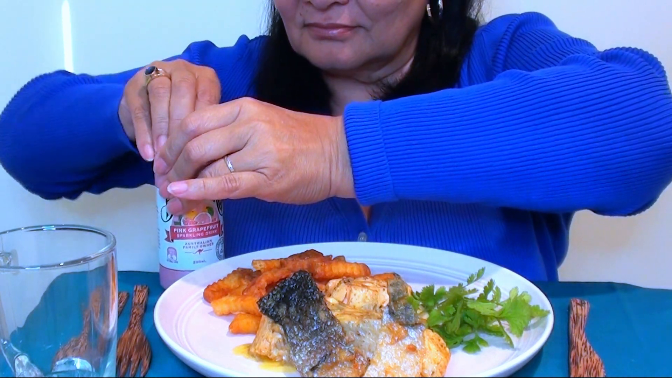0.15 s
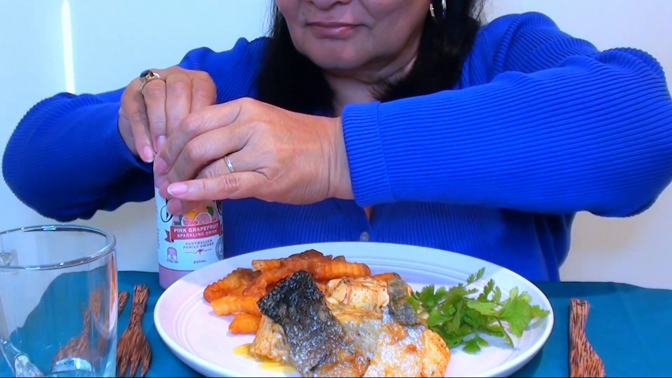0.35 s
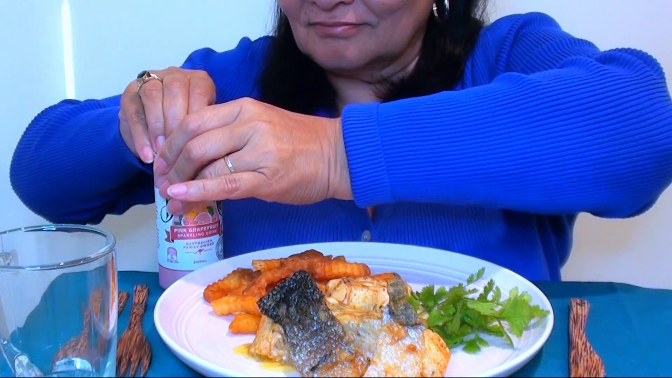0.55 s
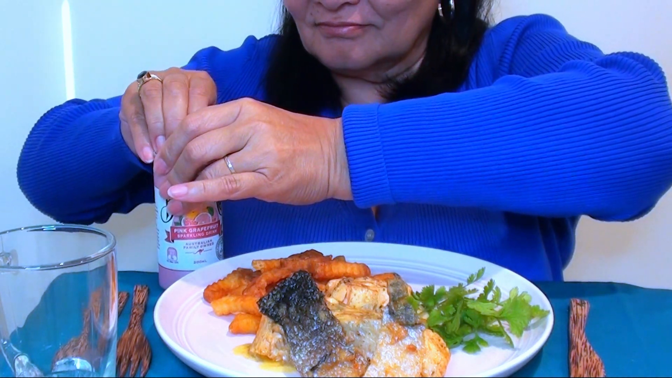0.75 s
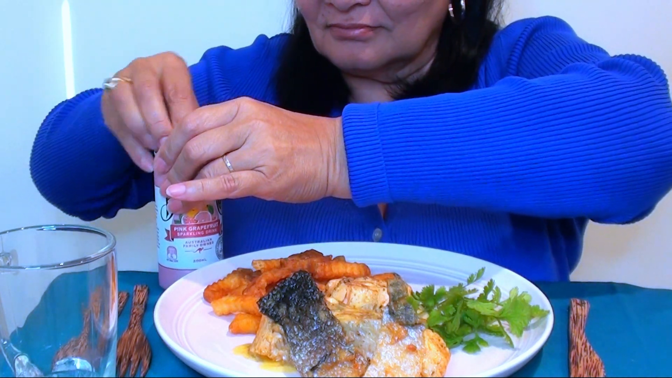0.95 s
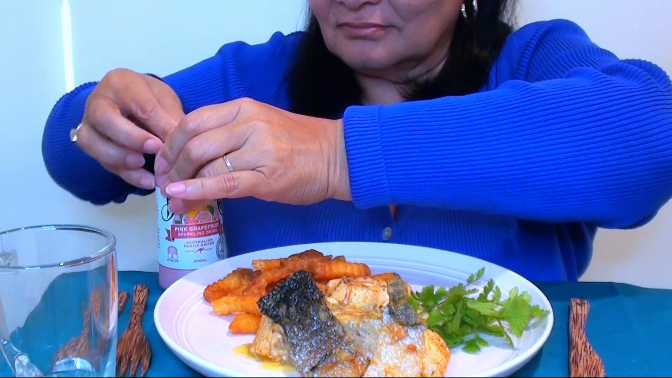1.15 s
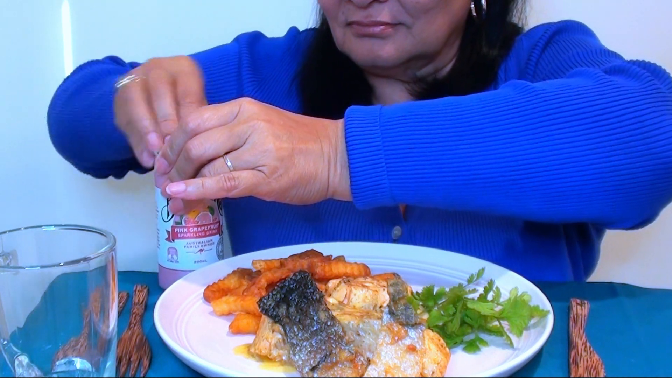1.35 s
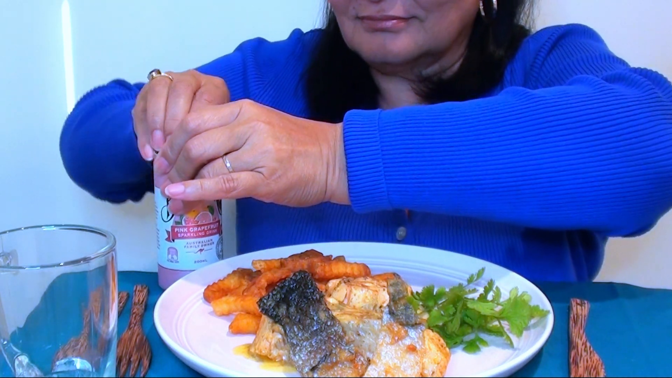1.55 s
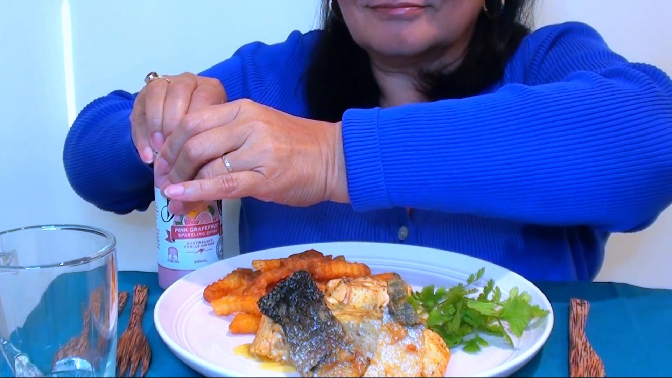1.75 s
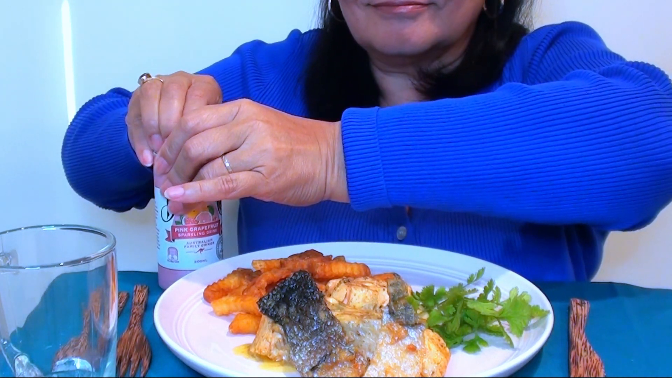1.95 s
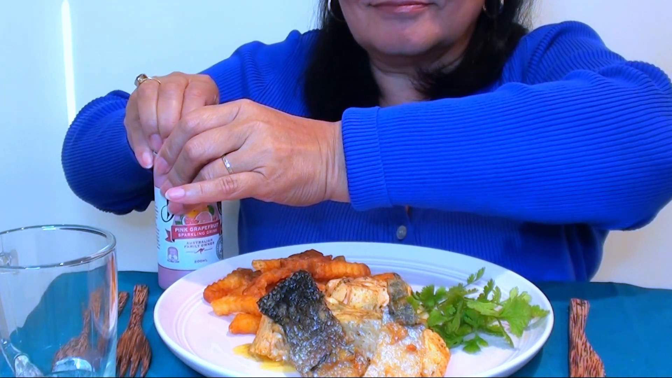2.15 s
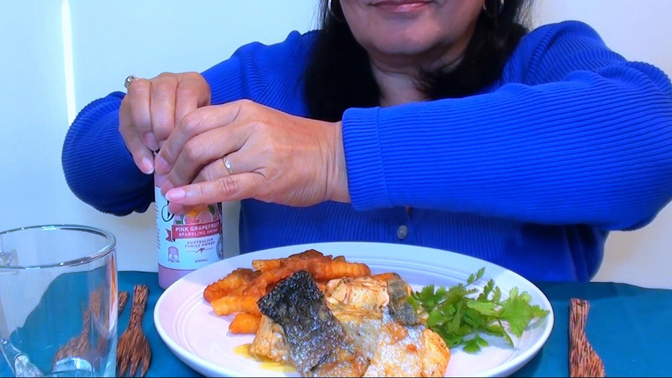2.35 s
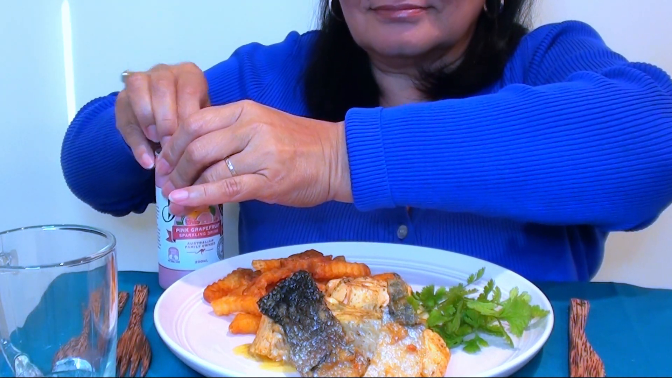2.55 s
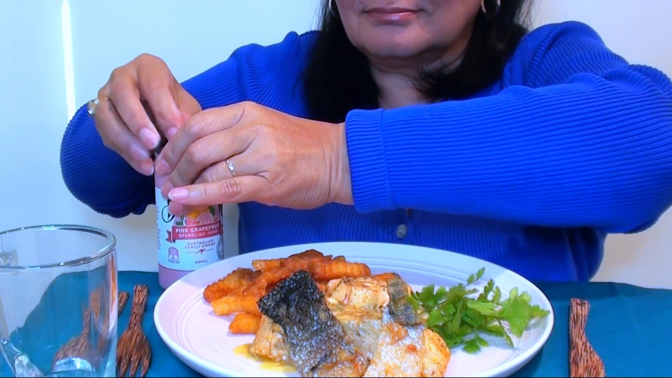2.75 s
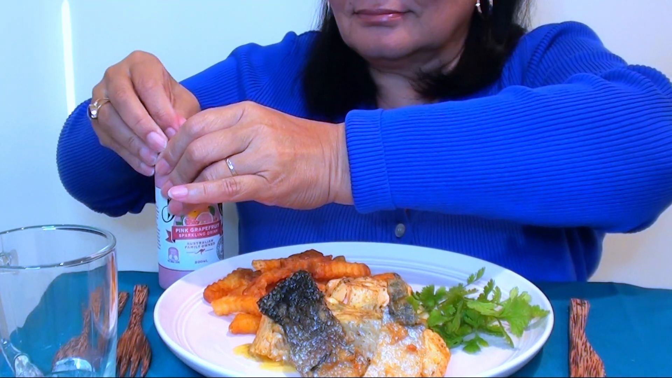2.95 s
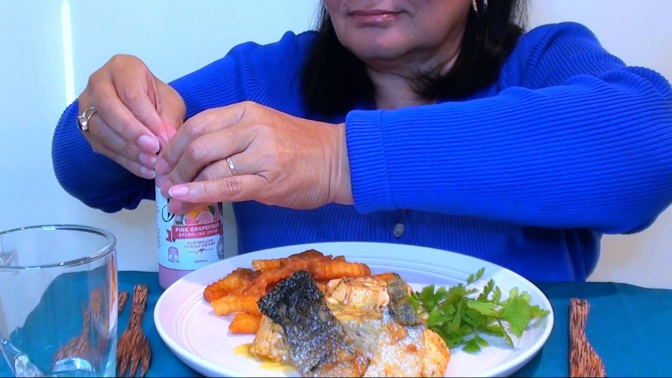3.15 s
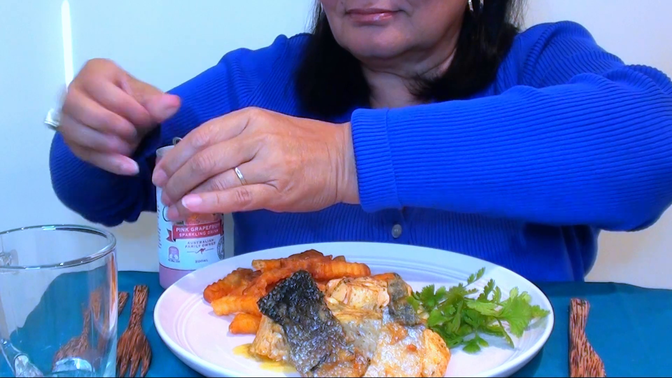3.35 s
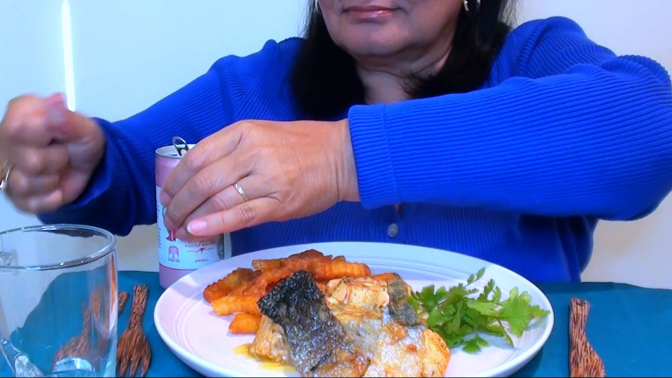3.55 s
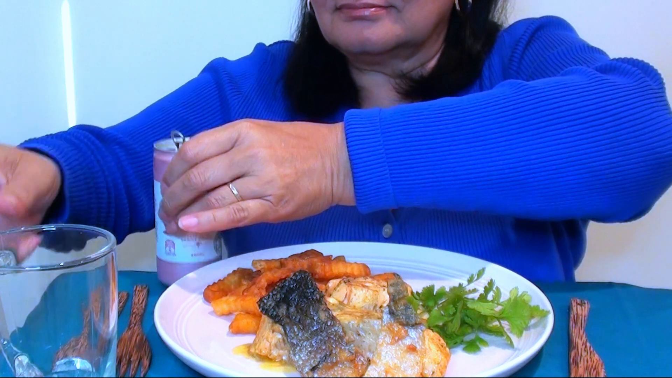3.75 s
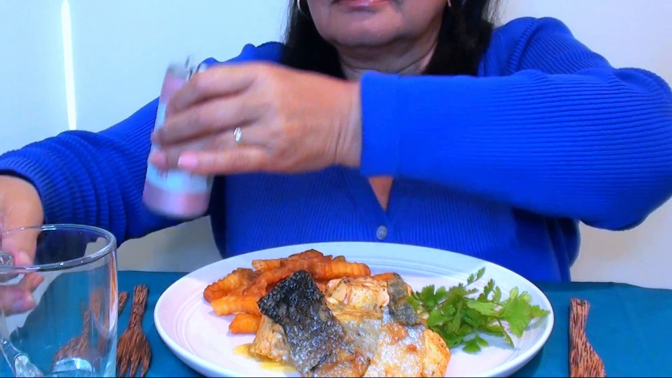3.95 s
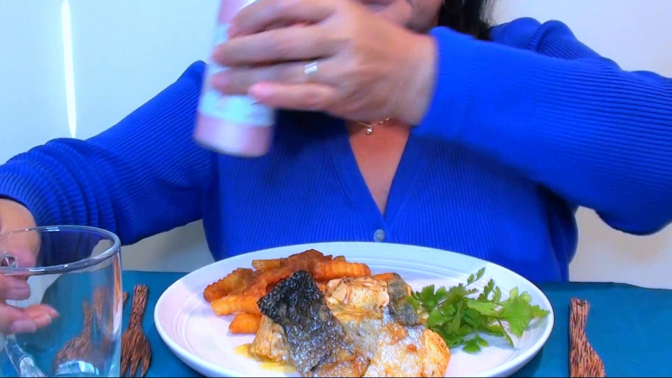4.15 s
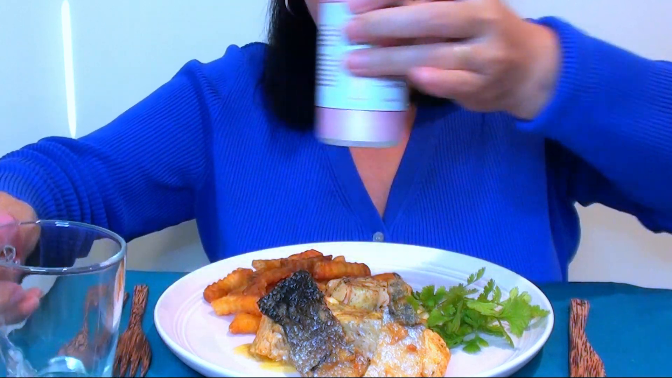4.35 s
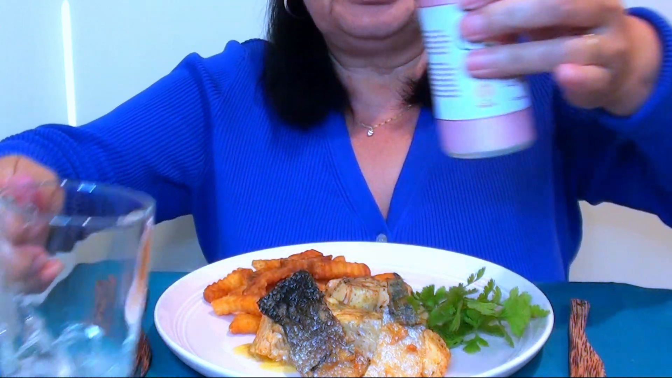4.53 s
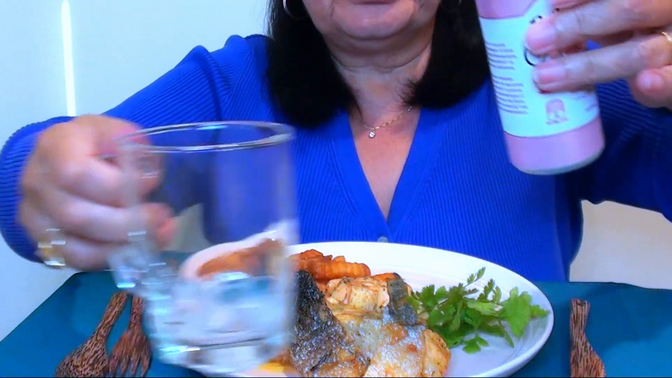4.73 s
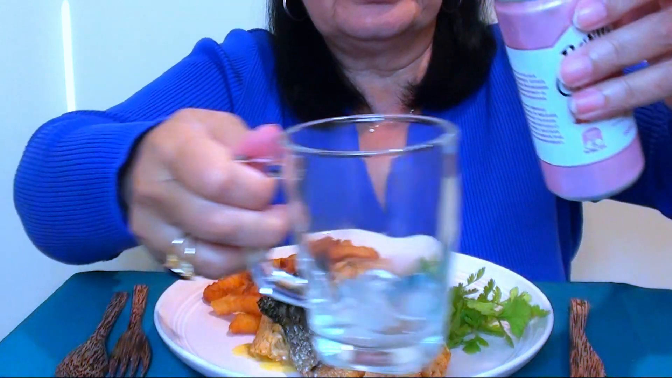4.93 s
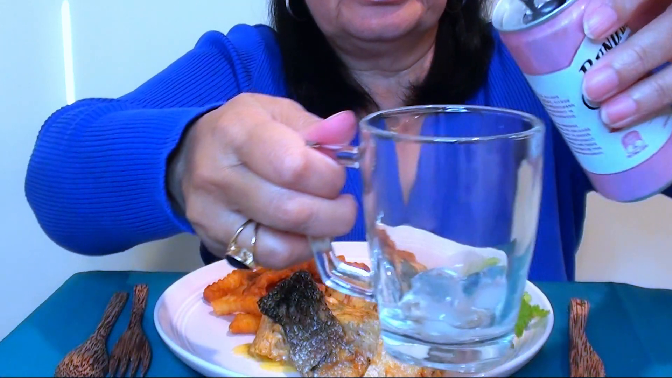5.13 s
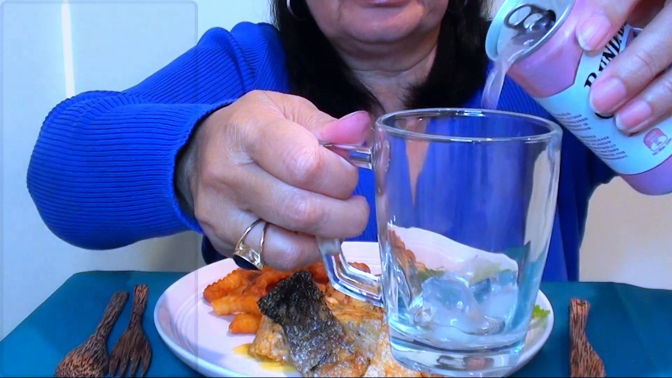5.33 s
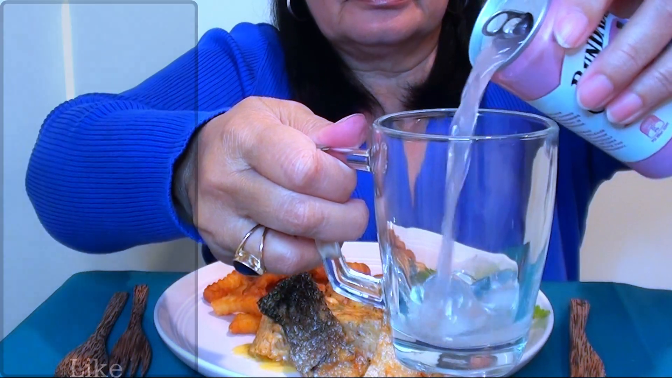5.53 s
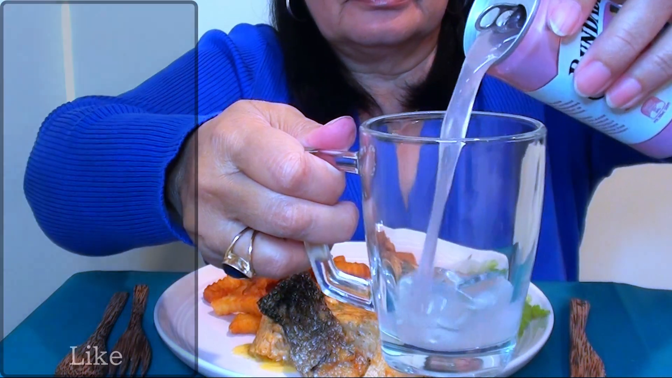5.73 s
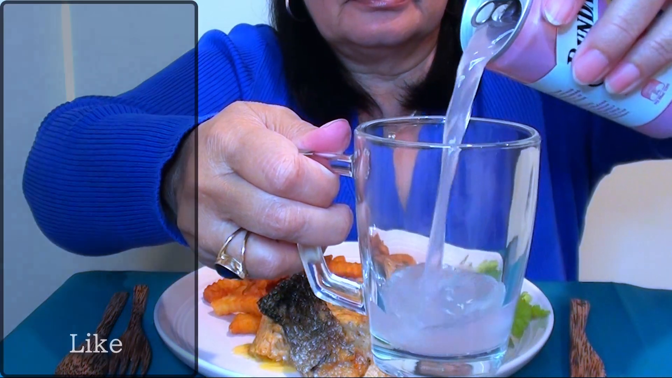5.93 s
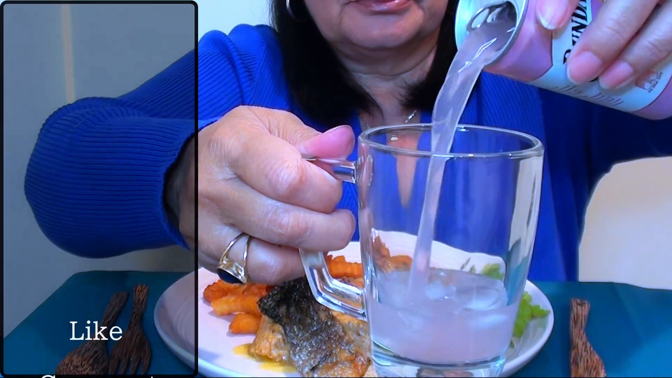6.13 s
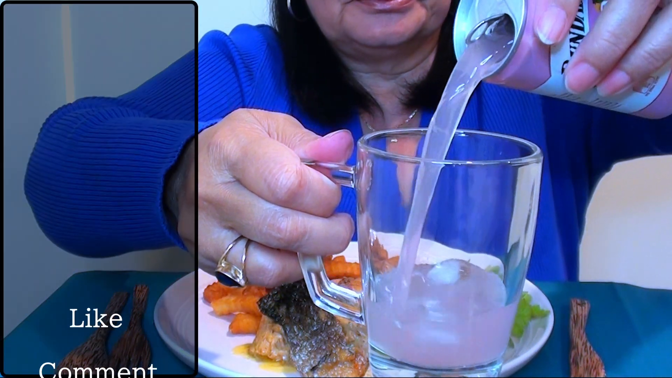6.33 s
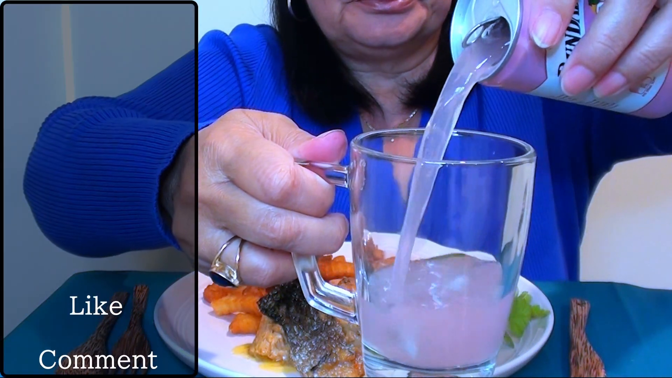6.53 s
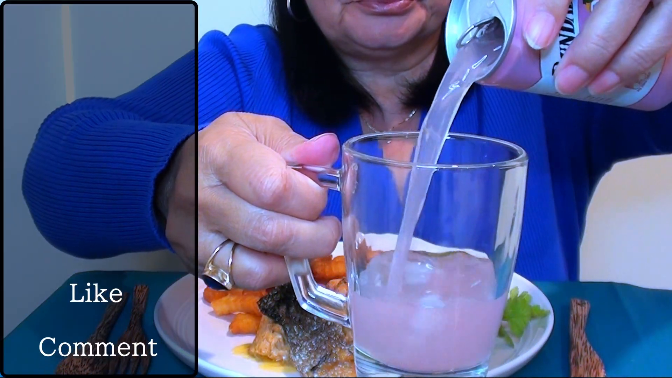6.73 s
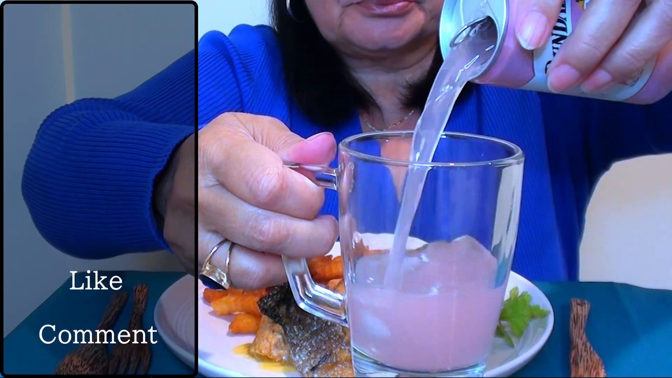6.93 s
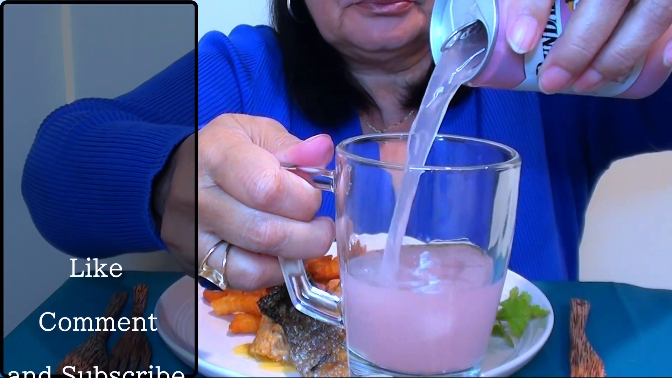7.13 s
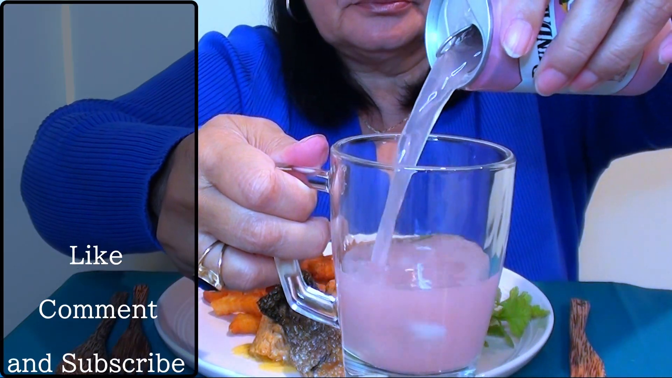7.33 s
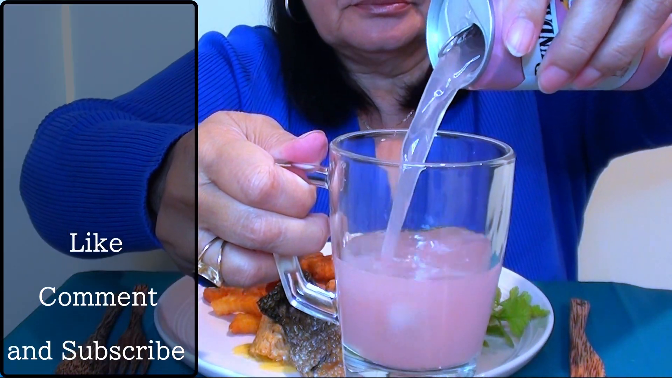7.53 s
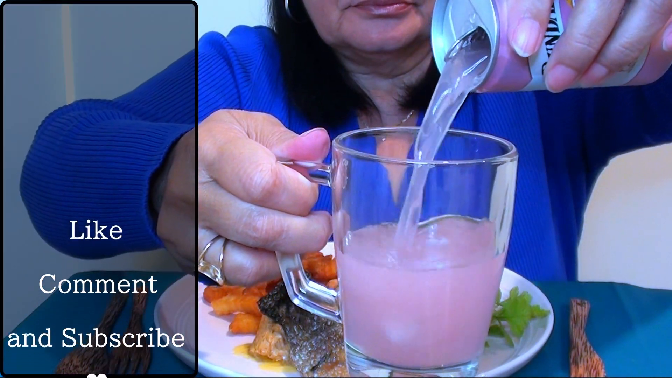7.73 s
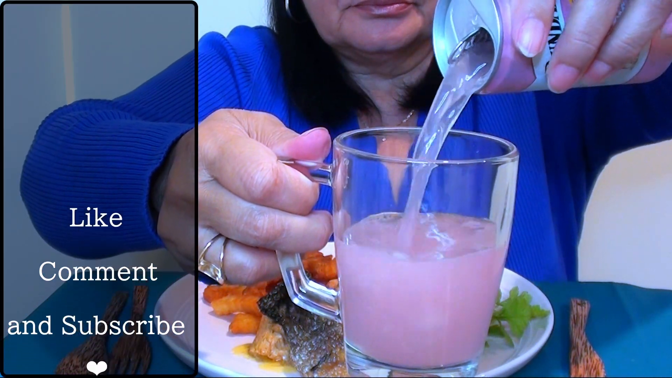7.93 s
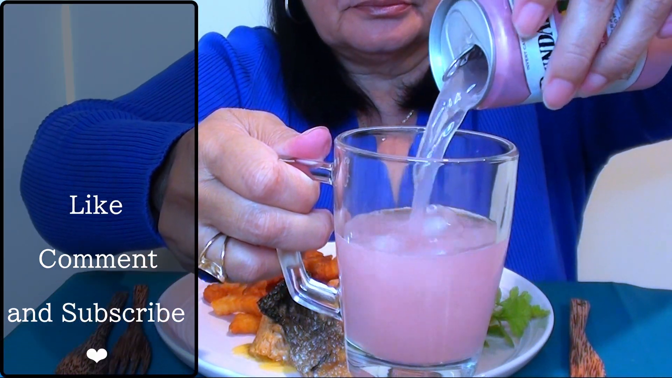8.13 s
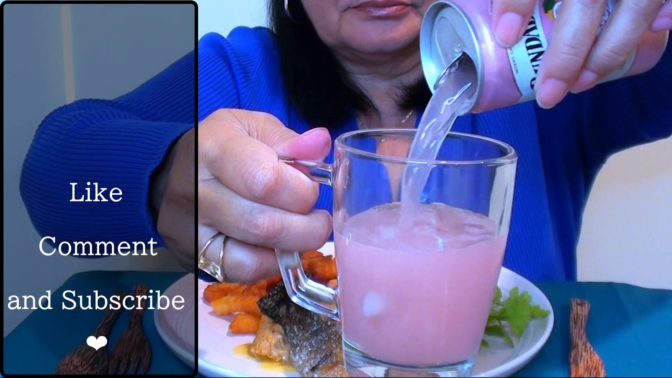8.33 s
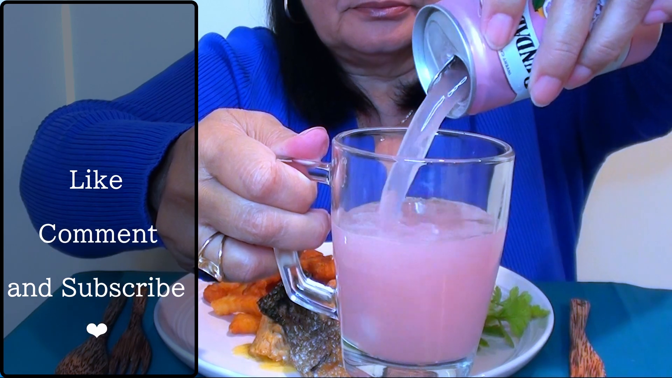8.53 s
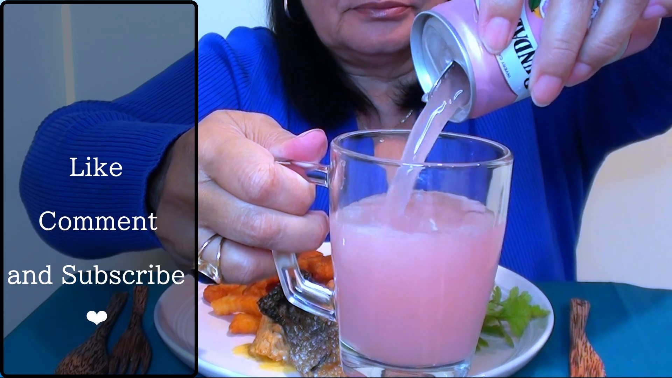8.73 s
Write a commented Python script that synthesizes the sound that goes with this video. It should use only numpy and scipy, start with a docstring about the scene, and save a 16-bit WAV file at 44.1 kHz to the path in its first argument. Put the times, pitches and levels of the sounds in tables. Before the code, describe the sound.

Close up at a table in a quiet room, fingernails scuff and tick on a drink can's tab. The ticks quicken into a loud metallic crack and a brief hiss of gas, then faint fizz and small clicks. A glass mug with ice gives light clinks. Sparkling drink spatters onto the ice, then pours in a bubbling stream as foam hiss rises to the end.

```python
"""A drink can at a table, close by: fingers work the tab until it cracks open and the gas hisses out.
A glass mug is touched and filled: drops spatter on the ice, bubbles ring the air in mug and can, foam hisses.
Tab snaps are ticks and noise puffs driving resonances; glass touches are dying sines, short pings and noise
ticks. Bubbles and drops are mainly dying sines climbing in pitch; gas, foam and finger rubs are shaped noise.
A short echo and a quiet room surround them, in one channel."""
import sys
import numpy as np
from scipy import signal
from scipy.fft import rfft, irfft
from scipy.io import wavfile
from scipy.ndimage import uniform_filter1d

SR = 44100
rng = np.random.default_rng(int(sys.argv[2]) if len(sys.argv) > 2 else 0)


def to_wav(s):
    """Save 16-bit WAV."""
    ch = np.atleast_2d(s).T  # columns
    pcm = np.round(np.clip(ch, -1, 1) * 32767)  # PCM
    wavfile.write(sys.argv[1], SR, pcm.astype(np.int16))


N = 387198

# Colour of the quiet room: pitch_hz, density_db (per Hz, relative)
ROOM_COLOUR = [(26, -33.5), (45, -3), (96, -24.5), (284, -17.5), (338, -27.5), (401, -16.5), (859, -18.5),
               (1020, -18), (1150, -20.5), (1800, -20.5), (2130, -23.5), (3010, -22.5), (4920, -27),
               (16000, -31)]
# A slow rumble, perhaps the table swaying: time_s, level_db
RUMBLE_LEVEL = [(0.0, -51.5), (0.78, -54.5), (1.1, -45.5), (1.2, -55), (1.39, -44), (2.01, -56),
                (2.05, -43.5), (2.27, -50.5), (2.32, -64), (2.44, -41), (2.57, -51), (3.81, -45.5),
                (4.04, -56.5), (5.77, -58), (6.65, -65), (6.94, -60), (7.24, -61.5), (8.78, -63)]
# Colour of that rumble: pitch_hz, density_db (per Hz, relative)
RUMBLE_COLOUR = [(3, -31), (8, 1.5), (16, 3), (28, -6.5), (40, -12.5), (70, -42.5), (140, -56), (220, -65)]
# A soft low rush that swells as the arms move: time_s, level_db
RUSTLE_LEVEL = [(0.0, -69.5), (0.9, -75.5), (1.22, -65), (3.03, -79), (3.23, -68.5), (3.79, -81),
                (4.3, -72.5), (4.79, -74.5), (5.04, -61.5), (5.28, -80), (5.79, -80.5), (6.46, -72),
                (7.04, -86), (7.43, -75.5), (8.02, -74.5), (8.78, -82)]
# A faint low tone: time_s, level_db
DRONE_LEVEL = [(2.33, -78), (2.42, -59), (2.8, -82), (3.26, -72), (3.65, -90), (4.11, -80.5), (4.6, -100)]
# Fingers and nail scuff the can: start_s, level_db, length_s, squeak_hz, squeak_db
RUBS = [(0, -68, 0.052, 2150, -62.5), (0.071, -53, 0.047, 3270, -74), (0.173, -62.5, 0.088, 3530, -64),
        (0.81, -76, 0.31, 3100, -75), (0.921, -58.5, 0.11, 2130, -55), (0.933, -74, 0.084, 3050, -58),
        (0.977, -73, 0.065, 1850, -64), (1.02, -59, .08, 3200, -74), (1.152, -58, 0.057, 4740, -66),
        (1.306, -51.5, 0.014, 2970, -78), (1.365, -61, 0.075, 2900, -63), (1.689, -98, 0.21, 626, -66),
        (1.98, -47.5, 0.14, 633, -65), (2.138, -57, 0.1, 744, -63), (3.268, -67.5, 0.32, 2880, -73),
        (3.6, -70.5, 0.17, 3140, -71)]
# Colour of the scuffs: pitch_hz, density_db (per Hz, relative)
RUB_COLOUR = [(530, -53), (900, -40), (1600, -12), (2080, -10), (2600, -15.5), (2990, -9), (3870, -11.5),
              (4790, -9), (6980, -16.5), (9590, -18), (15000, -30.5)]
# The tab snaps and knocks on the lid; the last three levels are relative to level_db:
# start_s, level_db, ring_hz, treble_db, lid_db, hollow_db
SNAPS = [(0.084, -32, 3000, -7, -33, -24), (0.121, -25, 5230, -25, -14, -29),
         (0.237, -41, 2960, -18, -31, -27), (0.928, -29.5, 2150, -22, -24.5, -20),
         (1.305, -47.5, 2990, 9, -9, -14), (1.398, -39, 2800, -2, -12.5, -22),
         (1.841, -42.5, 5600, -7, -13, -26), (1.88, -34, 5640, -15, -4.5, -22),
         (1.918, -22.5, 5740, 13.5, -5.5, -37), (1.962, -18, 3240, -14, -4, -39),
         (1.99, -27, 4200, 8.5, -4.5, -45), (2.03, -16, 5440, -21, -20, -42.5),
         (2.148, -24.5, 4300, -2.5, -14.5, -38.5), (2.175, -42.5, 3400, -11, 3.5, -21.5),
         (2.229, -18.5, 5850, 4, -11.5, -39), (2.258, -28.5, 3620, -27.5, -10.5, -22.5),
         (2.271, -30, 5390, -3, -14, -6), (2.28, -14, 5600, -9.5, -22, -35),
         (2.283, -5.5, 2970, 0.5, -18, -29.5), (2.631, -31, 1270, -26, -19, -13.5),
         (2.882, -33.5, 1434, 11.5, 1.5, -3), (3.079, -39, 1350, -20, -8.5, -4.5),
         (3.162, -46, 1360, -9, -30, -8.5), (3.299, -40.5, 2840, 6, -12, -14),
         (3.371, -44.5, 1810, -8, -14, -10.5), (3.543, -43.5, 1410, -3, -17, -25)]
# Resonances of the metal lid: pitch_hz, width_hz, level_db
LID_MODES = [(633, 180, -29), (2270, 1200, 13.5), (3250, 390, 10), (3740, 820, 9.5), (4330, 590, 2),
             (4886, 400, -2), (5600, 449, 7), (7100, 430, -2), (8460, 1100, 3.5), (10820, 7000, -1.5)]
# Resonances of the air in the can: pitch_hz, width_hz, level_db
HOLLOW_MODES = [(1350, 387, 0), (1960, 440, -4.5), (2290, 110, -18), (3180, 730, 5.5), (3680, 95, -17),
                (5060, 200, -12)]
# Gas rushes out of the cracked seal: time_s, level_db
GAS_LEVEL = [(2.285, -60), (2.3, -43.5), (2.35, -39), (2.44, -41), (2.52, -56.5), (2.6, -63), (2.75, -102)]
# Colour of the gas jet: pitch_hz, density_db (per Hz, relative)
JET_COLOUR = [(290, -59.5), (500, -26.5), (851, -17.5), (1150, -4.5), (1410, -14), (1700, -7.5),
              (1820, -12.5), (2460, -16.5), (3330, -3.5), (3850, -10), (5130, -11.5), (8120, -21.5),
              (8980, -25), (12700, -27.5), (15500, -48)]
# The drink fizzes inside the can: time_s, level_db
SIMMER_LEVEL = [(2.4, -82), (2.6, -71.5), (2.8, -68), (2.9, -62.5), (3.1, -63.5), (3.4, -72), (3.74, -67.5),
                (3.79, -83)]
# Colour of that fizz: pitch_hz, density_db (per Hz, relative)
SIMMER_COLOUR = [(1180, -44), (2000, -14), (2360, -21), (3060, 3.5), (3860, -11), (4210, 0), (4630, -10),
                 (5090, 2), (5690, 1), (8480, -0.5), (10200, -5), (14700, -5), (15800, -20)]
# A finger ring meets the glass: start_s, level_db
RING_TAPS = [(4.057, -55)]
# The mug is touched and ice shifts in it: start_s, level_db, pitch_hz, tick_db (relative to level_db)
CLINKS = [(4.6784, -48, 2920, -3), (4.8553, -34, 1440, -6.5), (4.889, -51, 1540, 2),
          (4.9232, -57, 6130, 13), (4.9346, -42.5, 7720, 1), (4.954, -45.5, 1260, -12),
          (5.209, -48, 1120, -3), (5.247, -57, 2060, -2)]
# Ringing modes of the glass: pitch_hz, level_db, t60_s
GLASS_MODES = [(2140, 2, 0.3), (1940, -3, 0.48), (3450, -1.5, 0.19), (4450, -6, 0.18), (5389, -6, 0.18),
               (6580, -8, .19), (9150, -9, 0.045), (10630, -9, .05)]
# The stream, small bubbles churning and tiny ones crackling: time_s, churn_db, crackle_db
POUR_LEVELS = [(5.45, -95, -83), (5.71, -74, -52.5), (6.14, -57, -65), (6.4, -68, -63),
               (6.61, -60.5, -65.5), (6.89, -53.5, -58), (7.04, -49.5, -62), (7.16, -56.5, -58),
               (7.33, -57, -66), (7.55, -61, -61.5), (7.8, -51, -62), (7.95, -49.5, -56.5),
               (8.21, -53, -63), (8.35, -54.5, -62), (8.54, -60.5, -65), (8.78, -70, -53.5)]
# Drops spatter on ice and surface: start_s, level_db, pitch_hz, t60_s
DROPS = [(5.4831, -26.5, 7980, 0.0044), (5.5548, -23, 7840, 0.0035), (5.5624, -36, 7150, 0.005),
         (5.5754, -41, 14200, 0.005), (5.5894, -35, 4900, 0.005), (5.5936, -27, 4800, 0.0054),
         (5.6074, -28, 9100, 0.0046), (5.6127, -30.5, 4970, 0.005), (5.6392, -32, 5970, 0.005),
         (5.6615, -34, 11000, 0.005), (5.674, -28, 4800, 0.0056), (5.688, -19, 14200, 0.0037),
         (5.6956, -24, 4900, 0.0032), (5.7134, -22, 8540, 0.0031), (5.7354, -44, 3950, 0.005),
         (5.7424, -44, 4880, 0.005), (5.748, -38, 6790, 0.005), (5.7765, -31.5, 8740, 0.0046),
         (5.8017, -28.5, 11700, 0.005), (5.807, -31, 11800, 0.005), (5.8184, -45, 4050, 0.0055),
         (5.8596, -44, 8400, 0.005), (5.875, -38, 5840, 0.0056), (5.902, -35, 4010, 0.005),
         (5.907, -41, 4500, 0.005), (5.962, -25.5, 4200, 0.0032), (5.984, -22.5, 7200, 0.0021),
         (6.001, -41, 4310, 0.005), (6.0731, -40, 8400, 0.0062), (6.2685, -31.5, 7400, 0.0033),
         (6.343, -28, 4200, 0.0035), (6.356, -29, 8640, 0.0028), (6.3663, -34, 4760, 0.005),
         (6.561, -34.5, 9030, 0.0041), (6.6178, -12, 5140, 0.0027), (6.7298, -27.5, 5750, 0.0063),
         (6.7615, -29.5, 4200, 0.005), (6.814, -19.5, 4800, 0.003), (6.8994, -36, 7550, 0.0046),
         (6.9364, -35, 8760, 0.005), (6.9454, -26.5, 4300, 0.0035), (6.9624, -35, 6140, 0.005),
         (6.9845, -24, 4320, 0.0042), (7.034, -33, 5900, 0.0054), (7.1155, -26.5, 3800, 0.0036),
         (7.1374, -45, 4520, 0.0043), (7.2484, -33, 4600, 0.007), (7.2964, -30.5, 3720, 0.0056),
         (7.3093, -34, 4700, 0.0045), (7.47, -34, 4810, 0.005), (7.4874, -30.5, 4060, 0.0054),
         (7.5026, -28, 4300, 0.0069), (7.5208, -34, 4860, 0.0064), (7.587, -22.5, 4600, 0.0046),
         (7.629, -27, 4100, 0.0047), (7.7558, -25.5, 5100, 0.006), (7.7826, -25.5, 4840, 0.005),
         (7.9169, -30, 3800, 0.0059), (7.958, -35, 4370, 0.005), (7.9924, -32, 9300, 0.0043),
         (8.101, -36, 5280, 0.005), (8.1236, -19, 3900, 0.0042), (8.3044, -40, 4100, 0.005),
         (8.3524, -37, 4760, 0.005), (8.3622, -28, 5230, 0.005), (8.3794, -33, 4800, 0.005),
         (8.684, -38, 4900, 0.0054), (8.7564, -22, 5420, 0.004), (8.7654, -39, 3800, 0.0068)]
# Large bubbles pinched off by the stream; the last column kicks the air in the mug:
# start_s, level_db, pitch_hz, t60_s, kick_db (relative to level_db)
BUBBLES = [(5.713, -26.5, 1350, 0.01, -18), (5.777, -40, 2560, 0.013, -18),
           (5.902, -22.5, 1280, 0.023, -17.5), (5.915, -25.5, 2260, 0.013, -14),
           (5.936, -27, 2240, 0.012, -22), (5.961, -29, 3050, 0.013, -19), (6, -28, 2880, 0.015, -19),
           (6.009, -23, 1270, 0.028, -13), (6.017, -31.5, 1330, 0.024, -9),
           (6.036, -25.5, 1290, 0.014, -15.5), (6.062, -30, 1230, 0.0089, -13),
           (6.208, -37.5, 1010, 0.024, -19), (6.226, -32.5, 1260, 0.02, -14),
           (6.255, -33.5, 1286, 0.032, -10.5), (6.268, -43, 1280, 0.013, -9),
           (6.323, -25.5, 1360, 0.0089, -16), (6.343, -31, 1990, 0.013, -14),
           (6.343, -18.5, 2490, 0.0063, -22), (6.366, -34.5, 2670, 0.011, -13),
           (6.377, -26.5, 1030, 0.015, -25), (6.386, -21, 1310, 0.02, -17), (6.409, -30, 1160, 0.015, -10),
           (6.483, -36.5, 1150, 0.013, -17), (6.56, -31.5, 1370, 0.015, -24),
           (6.617, -23, 1380, 0.015, -16), (6.629, -26.5, 1370, 0.028, -9),
           (6.647, -27.5, 1330, 0.021, -22), (6.659, -32.5, 1350, 0.028, -15),
           (6.706, -26, 1360, 0.032, -14.5), (6.729, -27, 1270, 0.029, -16), (6.765, -22, 1270, 0.025, -19),
           (6.789, -33.5, 1170, 0.017, -27), (6.812, -31, 1300, 0.019, -8), (6.9, -33.5, 1190, 0.012, -9.5),
           (6.945, -27.5, 1180, 0.024, -9.5), (6.984, -17, 1196, 0.025, -19),
           (7.009, -35, 1110, 0.045, -28), (7.026, -26.5, 1130, 0.037, -25),
           (7.033, -25.5, 1081, 0.045, -17), (7.069, -32, 1150, 0.023, -20), (7.092, -25, 1085, 0.039, -20),
           (7.116, -29, 1050, 0.04, -17), (7.187, -24, 1140, 0.014, -22), (7.223, -14.5, 1140, 0.014, -27),
           (7.247, -14, 1140, 0.012, -31), (7.281, -34, 1020, 0.037, -20), (7.296, -24, 1400, 0.014, -14.5),
           (7.309, -29.5, 980, 0.012, -7.5), (7.335, -25.5, 1170, 0.018, -18.5),
           (7.357, -20, 1230, 0.013, -33), (7.377, -31.5, 1040, 0.026, -25), (7.448, -41, 3000, 0.015, -27),
           (7.469, -29.5, 1820, 0.0068, -11.5), (7.489, -27.5, 1265, 0.034, -7.5),
           (7.587, -25.5, 1340, 0.0089, -10), (7.596, -30, 1370, 0.015, -22),
           (7.629, -24.5, 2780, 0.015, -15), (7.637, -23.5, 1260, 0.013, -14.5),
           (7.661, -28.5, 3050, 0.022, -14.5), (7.689, -30, 1570, 0.017, -27),
           (7.71, -13.5, 1290, 0.0085, -24), (7.739, -24, 1370, 0.012, -27),
           (7.757, -19.5, 2860, 0.011, -19), (7.782, -25.5, 3000, 0.013, -25),
           (7.804, -15.5, 1420, 0.015, -17), (7.828, -30, 1310, 0.022, -23), (7.838, -30, 1410, 0.018, -16),
           (7.851, -34, 1400, 0.027, -27), (7.885, -21, 1370, 0.019, -24), (7.894, -26, 1420, 0.024, -25),
           (7.917, -20, 1430, 0.011, -13), (7.958, -31, 3050, 0.011, -19), (7.966, -35, 1030, 0.018, -22),
           (7.978, -27.5, 2170, 0.0092, -14), (7.992, -20, 3010, 0.015, -11),
           (8.02, -27, 1250, 0.015, -18.5), (8.047, -27, 1260, 0.018, -19), (8.062, -29, 1250, 0.017, -12),
           (8.081, -18.5, 1255, 0.022, -20), (8.091, -38, 1160, 0.018, -21),
           (8.124, -22, 3140, 0.011, -14.5), (8.136, -29, 1230, 0.013, -22), (8.144, -23, 1190, 0.01, -18),
           (8.155, -38, 3000, 0.012, -13), (8.206, -15, 1350, 0.017, -19),
           (8.238, -34.5, 1350, 0.021, -14.5), (8.354, -23, 1190, 0.02, -16), (8.36, -30, 2830, 0.0065, -6),
           (8.361, -22, 1326, 0.02, -12), (8.381, -27, 1720, 0.016, -12), (8.405, -21.5, 1680, 0.022, -15),
           (8.427, -31, 1660, 0.017, -17), (8.441, -34, 1360, 0.015, -13.5), (8.453, -32, 1080, 0.015, -17),
           (8.482, -30, 1420, 0.012, -12), (8.513, -28.5, 1117, 0.027, -14.5),
           (8.555, -35.5, 1660, 0.015, -15.5), (8.756, -18.5, 2020, 0.0098, -18.5),
           (8.766, -25.5, 1960, 0.018, -11)]
# Resonances of the mug: pitch_hz, width_hz, level_db
MUG_MODES = [(1069, 325, 2.5), (1385, 490, 3), (1405, 54, -11.5), (1730, 310, 0.5), (2130, 340, 0),
             (2496, 430, -1), (3050, 680, 6.5), (3118, 96, -7.5), (4650, 790, -11)]
# The air space in the can grows and its note falls: time_s, pitch_hz
CAN_NOTE = [(5.7, 1340), (6.57, 1238), (7.02, 1100), (7.2, 1020), (7.41, 820), (7.82, 764), (7.93, 575),
            (8.42, 528), (8.78, 466)]
# Kick to the air in the can, against that in the mug: time_s, level_db
CAN_KICK = [(5.7, -6), (7.1, -1), (7.3, -7), (7.7, -17), (8.0, -11), (8.5, -13.5), (8.78, -27)]
# How strongly bubbles ring the glass, fading as the mug fills: time_s, level_db
WALL_LEVEL = [(5.69, -36), (5.9, -34), (6.4, -32), (6.9, -43), (7.6, -67)]
# One low gulp: start_s, level_db, pitch_hz, t60_s
GULPS = [(7.418, -39.5, 300, 0.053)]
# Hiss of the growing foam: time_s, level_db
FOAM_LEVEL = [(5.6, -88), (6.0, -76), (6.6, -71), (7.2, -68), (7.7, -60), (8.2, -62), (8.5, -56.5),
              (8.78, -55)]
# Colour of that hiss: pitch_hz, density_db (per Hz, relative)
FOAM_COLOUR = [(1470, -35), (2500, -17), (3200, -1), (3560, -51), (4190, -25), (4850, -4), (7650, -10.5),
               (8260, -3.5), (10800, -12), (13000, -6.5), (15800, -9.5)]

ROOM_DB, DRONE_HZ = -66.5, 185
PUSH_DB, OWN_NOTE_DB = -28.5, -5.5  # blunt push under a snap; its lingering note against the hollow rattle
EDGE_DB, EDGE_SCATTER_DB, SPRAY_DB = -17.5, 4.5, -6  # dry edge of a bubble, its random spread; spray of a drop
SWARM_DB, MUG_STIR_DB, CAN_STIR_DB = -3.5, -10.5, -17  # the parts of the churn
ECHO_DB, BAND_LIMIT_HZ = -11.5, 15950


def gain_of(db):
    """Amplitude factor for a level in dB."""
    return 10 ** (np.asarray(db) / 20)


def evened(x):
    """Scales a sound to rms 1."""
    return x / np.sqrt(np.mean(x ** 2) + 1e-20)


def curve(rows, column=1):
    """Gain at every sample, practically silent (-140 dB) outside the table."""
    rows = np.asarray(rows)
    db = np.interp(np.arange(N) / SR, rows[:, 0], rows[:, column], left=-140, right=-140)
    return gain_of(db)


def add(mix, start_s, sound):
    """Lays a sound into the mix, cut off at the end."""
    part = mix[round(start_s * SR):][:len(sound)]
    part += sound[:len(part)]


def high_pass(x, hz):
    """Weakens what lies under hz steeply."""
    return signal.sosfilt(signal.butter(4, hz, "high", fs=SR, output="sos"), x)


def coloured(x, points):
    """Tilts the spectrum of x along a table, at rms 1."""
    f, db = np.transpose(points)
    hz = np.fft.rfftfreq(len(x), 1 / SR)
    shape = gain_of(np.interp(np.log(hz + 1), np.log(f + 1), db))
    return evened(irfft(rfft(x) * shape, len(x)))


def resonate(x, hz, width_hz):
    """A steep resonance, fixed or gliding: shifts hz down to zero, smooths twice, shifts back."""
    turn = np.exp(2j * np.pi * np.cumsum(hz * np.ones(len(x))) / SR)
    r = np.exp(-np.pi * width_hz / SR)
    smooth = signal.lfilter([1 - r], [1, -2 * r, r ** 2], x / turn + 1e-18)
    return (turn * smooth).real


def body(x, modes):
    """Fixed steep resonances, each a double pole, summed with alternating sign."""
    out = np.zeros(len(x))
    for k, (hz, width_hz, db) in enumerate(modes):
        pole = np.exp((2j * hz - width_hz) * np.pi / SR)
        ring = signal.lfilter([1 - abs(pole)], [1, -2 * pole, pole ** 2], x + 1e-18).real
        out += (-1) ** k * gain_of(db) * ring
    return out


def ping(hz, t60_s, rise, soft=1.0):
    """A dying sine whose pitch climbs, as a bubble near the surface does; it swells over soft cycles."""
    t = np.arange(round(t60_s * SR)) / SR
    tone = -np.sin(2 * np.pi * hz * t * (1 + rise * t / t60_s))
    return tone * gain_of(-60 * t / t60_s) * (1 - np.exp(-t * hz / soft))


def burst(t60_s, edge=1, size=2500):
    """A dying puff of noise that rises in a fraction of a millisecond; edge 1 favours the treble."""
    z, t = rng.standard_normal(size + 1), np.arange(size) / SR
    noise = (z[1:] - edge * z[:-1]) / 3
    return noise * gain_of(-60 * t / t60_s) * (1 - np.exp(-t / 0.0001))


def sparse(per_s, spread_db):
    """Random clicks, a few of them large."""
    sizes = gain_of(spread_db * np.minimum(rng.exponential(1, N), 4))
    return sizes * (rng.random(N) < per_s / SR)


def room_tone():
    """The quiet room: coloured noise, slow rumble, a narrow low rush and a faint steady-pitched tone."""
    hush = gain_of(ROOM_DB) * coloured(rng.standard_normal(N), ROOM_COLOUR)
    rumble = coloured(rng.standard_normal(N), RUMBLE_COLOUR)
    rush = evened(resonate(rng.standard_normal(N), 317, 140))
    drone = np.sqrt(2) * np.sin(2 * np.pi * DRONE_HZ * np.arange(N) / SR)
    return hush + rumble * curve(RUMBLE_LEVEL) + rush * curve(RUSTLE_LEVEL) + drone * curve(DRONE_LEVEL)


def fingers():
    """Dense fine slips under each stroke, with one patch of metal singing along."""
    pressure, squeaks = np.zeros((2, N))
    for s, db, length_s, hz, squeak_db in RUBS:
        stroke = np.sin(np.pi * np.linspace(0, 1, round(length_s * SR)) ** 0.41)
        singing = evened(resonate(rng.standard_normal(len(stroke)), hz, 0.17 * hz))
        add(pressure, s, gain_of(db) * stroke)
        add(squeaks, s, gain_of(squeak_db) * stroke * singing)
    slips = rng.standard_normal(N) * (1.5 + sparse(1200, 3.0))
    return coloured(slips, RUB_COLOUR) * pressure + squeaks


def tab():
    """Each snap is a tick and a short ring that shake the lid and the air in the can."""
    out, lid, hollow = np.zeros((3, N))
    for s, db, hz, treble_db, lid_db, hollow_db in SNAPS:
        rattle = gain_of(db + hollow_db) * burst(0.18, edge=0, size=10000)
        add(out, s, gain_of(db) * ping(hz, 0.0032, 0.0208, soft=0.067))
        add(out, s, gain_of(db + treble_db) * burst(0.013, 0.6))
        add(out, s, gain_of(OWN_NOTE_DB) * resonate(rattle, hz, 200))
        add(out, s, gain_of(db + PUSH_DB) * ping(1660, 0.0034, 0.0194, soft=0.13))
        add(lid, s, gain_of(db + lid_db) * burst(0.011, 0.81))  # the metal buckles for a moment
        add(hollow, s, rattle)
    can = body(lid, LID_MODES) + 0.5 * body(hollow, HOLLOW_MODES)
    return high_pass(out, 83) + high_pass(can, 336)


def gas():
    """A jet of noise sputtering in level, then a fine fizz."""
    sputter = evened(uniform_filter1d(rng.standard_normal(N), 260))
    jet = coloured(rng.standard_normal(N) * gain_of(2.1 * sputter), JET_COLOUR)
    simmer = coloured(rng.standard_normal(N), SIMMER_COLOUR)
    return jet * curve(GAS_LEVEL) + simmer * curve(SIMMER_LEVEL)


def glass_ring(modes):
    """Ringing glass: dying sines, one for each mode."""
    t = np.arange(16000) / SR
    return sum(gain_of(db - 60 * t / t60_s) * np.sin(2 * np.pi * hz * t) for hz, db, t60_s in modes)


def mug_touches():
    """One clear ring of the glass, and dull clinks made of a short ping and a noise tick."""
    out = np.zeros(N)
    for s, db in RING_TAPS:
        add(out, s, gain_of(db) * glass_ring(GLASS_MODES))
    for s, db, hz, tick_db in CLINKS:
        add(out, s, gain_of(db) * ping(hz, 0.011, 0.0077))
        add(out, s, gain_of(db + tick_db) * burst(0.025))
    return out


def can_air(kicks):
    """The air space in the can rings at a falling note."""
    return resonate(kicks, np.interp(np.arange(N) / SR, *np.transpose(CAN_NOTE)), 114)


def drops():
    """Each drop is a very short ping with a spray of noise."""
    out = np.zeros(N)
    for s, db, hz, t60_s in DROPS:
        add(out, s, gain_of(db) * ping(hz, t60_s, 0.039, soft=0.29))
        spray = uniform_filter1d(burst(0.018, edge=0), size=2)
        # the spray lies above about half the drop's pitch
        add(out, s, gain_of(db + SPRAY_DB) * high_pass(spray, min(0.53 * hz, 15000)))
    return out


def large_bubbles():
    """Each bubble pings with a dry edge and kicks the air in mug and can and one glass mode."""
    out, mug, can, wall = np.zeros((4, N))
    scatter = EDGE_SCATTER_DB * rng.standard_normal(len(BUBBLES))
    for (s, db, hz, t60_s, kick_db), scatter_db in zip(BUBBLES, scatter):
        add(out, s, gain_of(db) * ping(hz, t60_s, 0.03, soft=0.45))
        edge = uniform_filter1d(burst(0.024, 0.24), size=3)
        add(out, s, gain_of(db + EDGE_DB + scatter_db) * edge)
        add(mug, s, gain_of(db + kick_db) * burst(0.025, edge=0))
        add(can, s, gain_of(db + kick_db) * burst(0.051, edge=0))
        add(wall, s, [gain_of(db)])
    glass = signal.oaconvolve(wall * curve(WALL_LEVEL), glass_ring(GLASS_MODES[:1]))[:N]
    return out + body(mug, MUG_MODES) + can_air(can * curve(CAN_KICK)) + glass


def churn():
    """Random swarms of small bubbles heard through the mug, and stirring noise in mug and can."""
    swarm = np.zeros(N)
    for hz in np.geomspace(950, 3600, 14):
        swarm += signal.oaconvolve(sparse(40, 2.5), ping(hz, 28 / hz, 0.12))[:N]
    stir = rng.standard_normal(N) * (0.6 + sparse(430, 9.0))
    mix = gain_of(SWARM_DB) * evened(body(swarm, MUG_MODES))
    mix += gain_of(MUG_STIR_DB) * evened(body(stir, MUG_MODES))
    mix += gain_of(CAN_STIR_DB) * evened(can_air(stir))
    return mix * curve(POUR_LEVELS)


def crackle():
    """Tiny bubbles popping at random, each a high short ping."""
    pops = np.zeros(N)
    for hz in np.geomspace(3800, 14000, 16):
        pops += signal.oaconvolve(sparse(12, 4.0), ping(hz, 40 / hz, 0.2, soft=1.2))[:N]
    return evened(pops) * curve(POUR_LEVELS, column=2)


def foam():
    """Hiss of foam: coloured noise with random stronger grains."""
    grains = rng.standard_normal(N) * (2.2 + sparse(1500, 1.4))
    return coloured(grains, FOAM_COLOUR) * curve(FOAM_LEVEL)


def gulps():
    """A low gulp: one slow-swelling ping."""
    out = np.zeros(N)
    for s, db, hz, t60_s in GULPS:
        add(out, s, gain_of(db) * ping(hz, t60_s, 0.05, soft=1.3))
    return out


def stream():
    """The pour: drops, bubbles and churn without bass, then crackle, foam and the low gulp."""
    splashing = drops() + large_bubbles() + churn()
    splashing = high_pass(high_pass(splashing, 380), 380)  # keep the bass out of the splashing
    return splashing + crackle() + foam() + gulps()


def walls(x):
    """Table and near walls answer with a short tail of random taps; the treble lasts a little longer."""
    at = np.arange(60, 9000, 20) + rng.integers(0, 20, 447)
    taps, t = np.zeros(9100), np.arange(9100) / SR
    taps[at] = rng.choice([-1., 1.], 447)
    bright = high_pass(taps, 2500)
    tail = (taps - bright) * gain_of(-60 * t / 0.2) + bright * gain_of(-60 * t / 0.26)
    return signal.oaconvolve(x, tail / np.linalg.norm(tail))[:N]


def scene():
    """The near sounds, their echo and the room."""
    near = fingers() + tab() + gas() + mug_touches() + stream()
    mix = near + gain_of(ECHO_DB) * walls(near) + room_tone()
    return mix[None]


def record(dry):
    """One channel, with a steep limit at the top of the treble."""
    low_pass = signal.firwin(511, BAND_LIMIT_HZ, window=("kaiser", 9), fs=SR)
    return signal.oaconvolve(dry, low_pass[None], "same")


dry = scene()
out = record(dry)
to_wav(out)
```